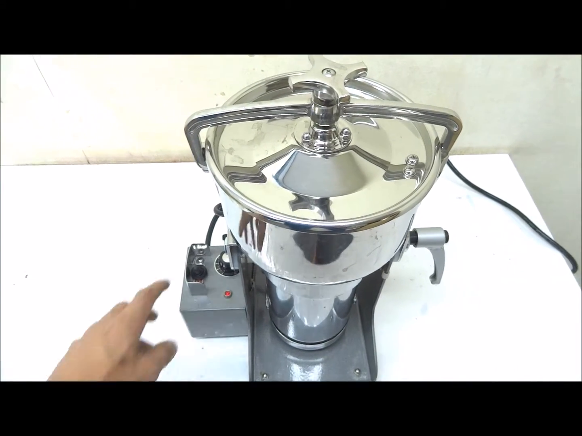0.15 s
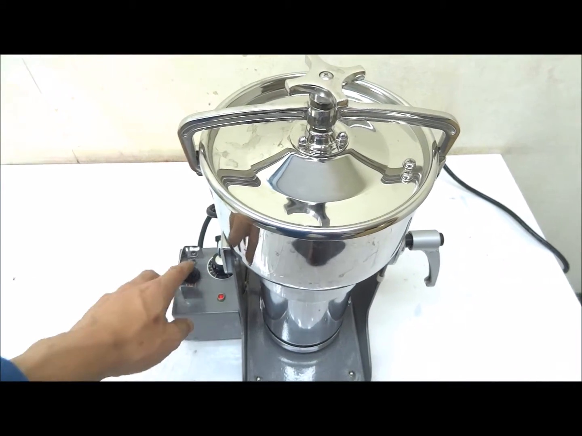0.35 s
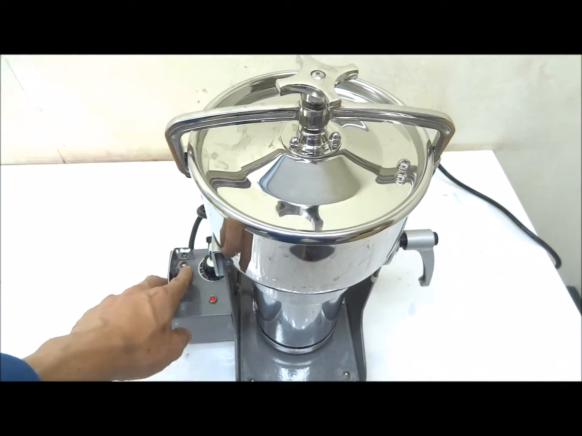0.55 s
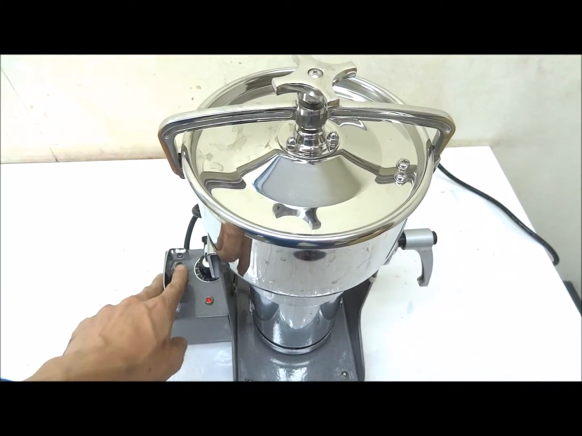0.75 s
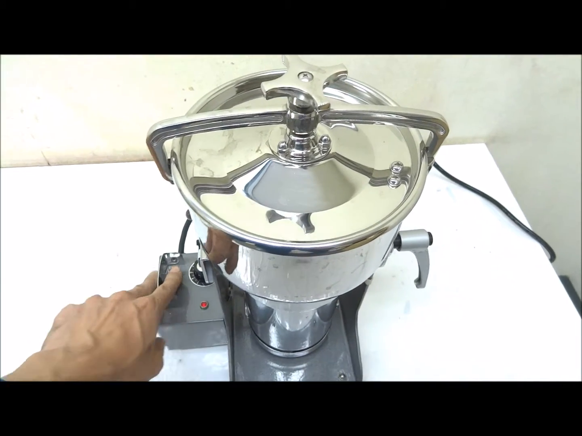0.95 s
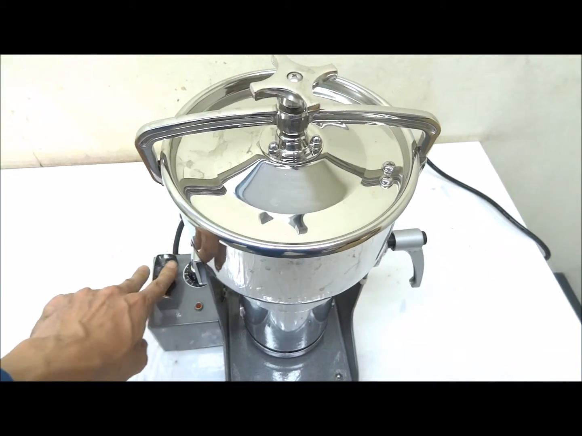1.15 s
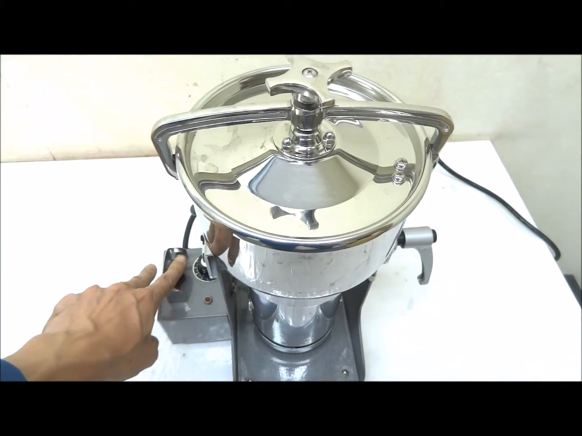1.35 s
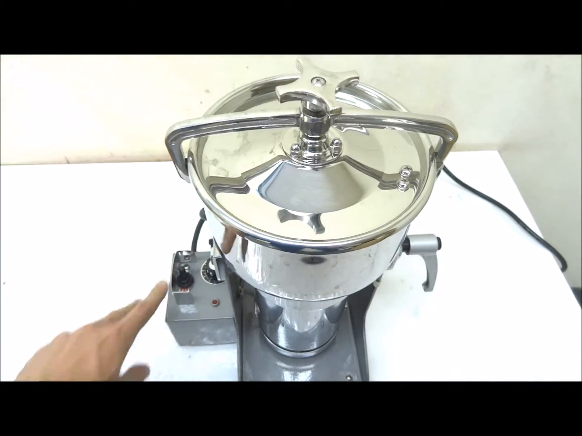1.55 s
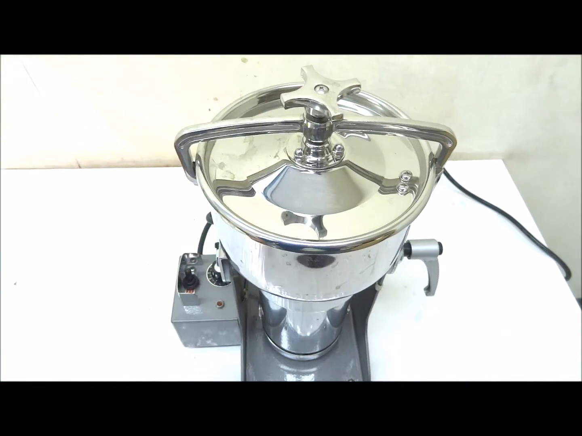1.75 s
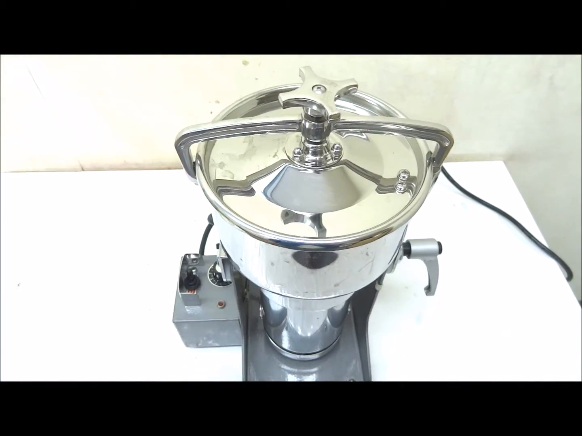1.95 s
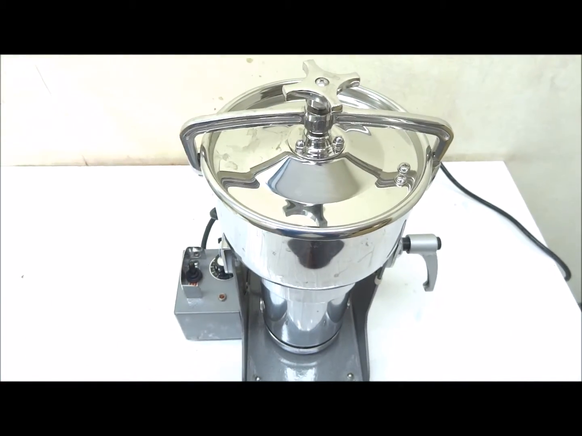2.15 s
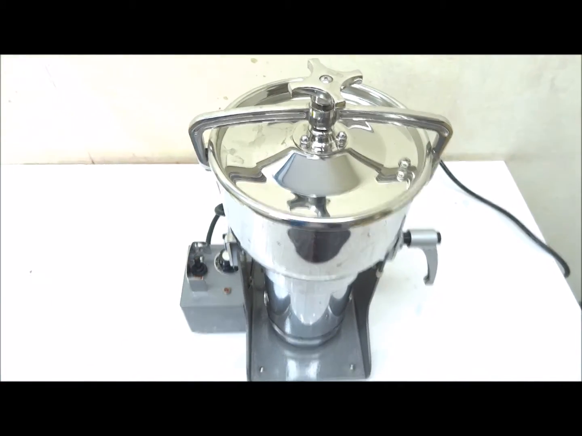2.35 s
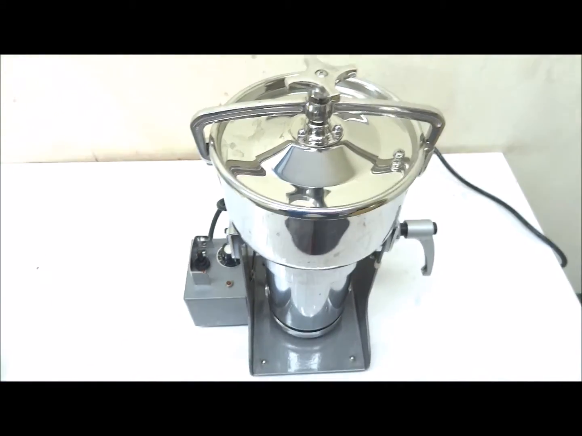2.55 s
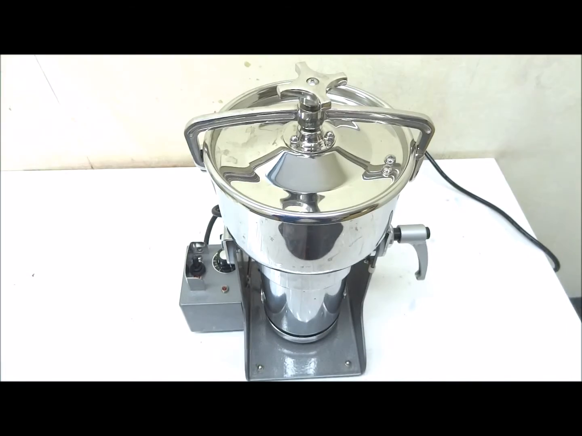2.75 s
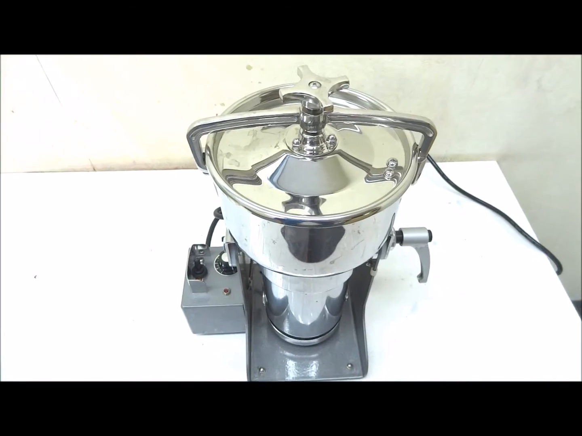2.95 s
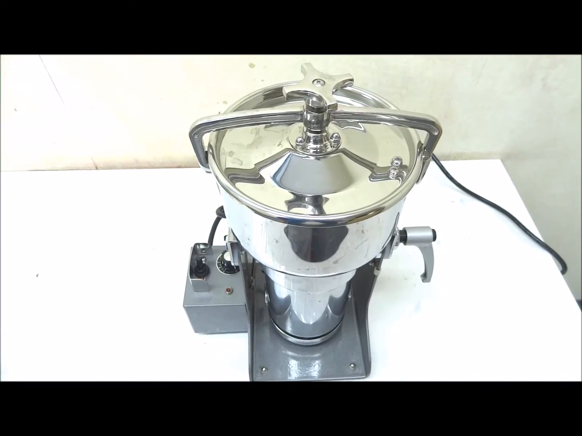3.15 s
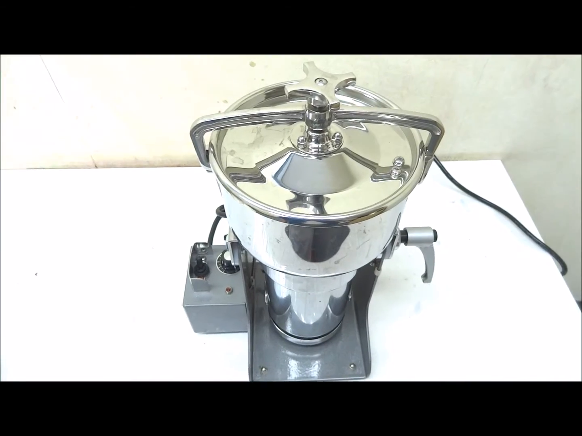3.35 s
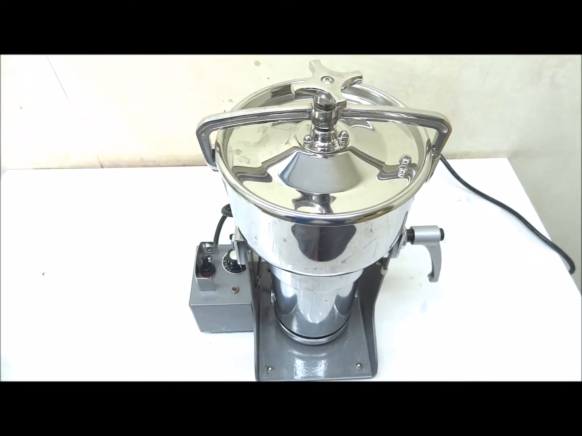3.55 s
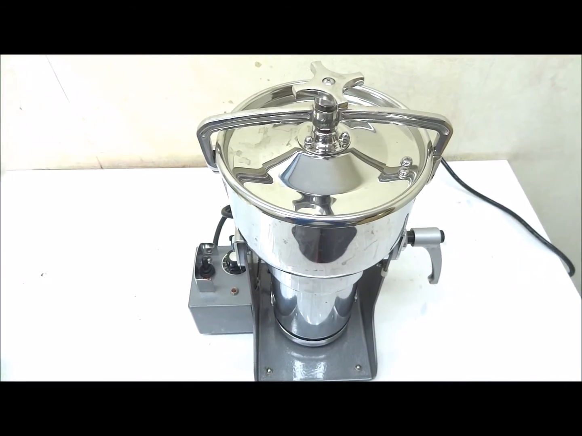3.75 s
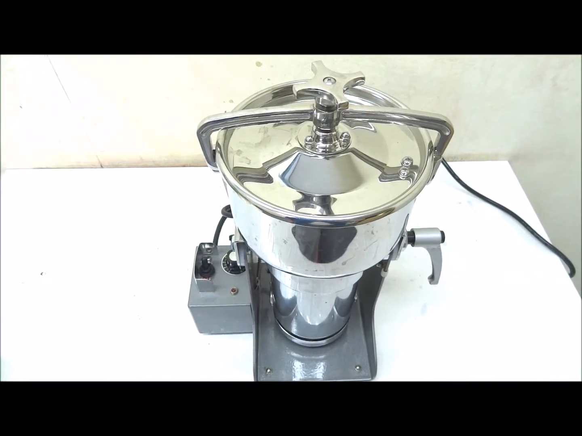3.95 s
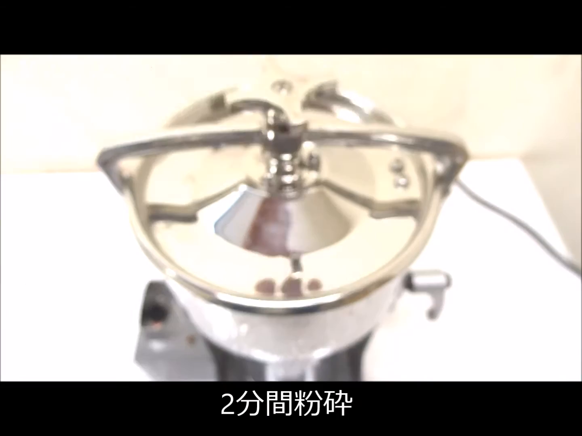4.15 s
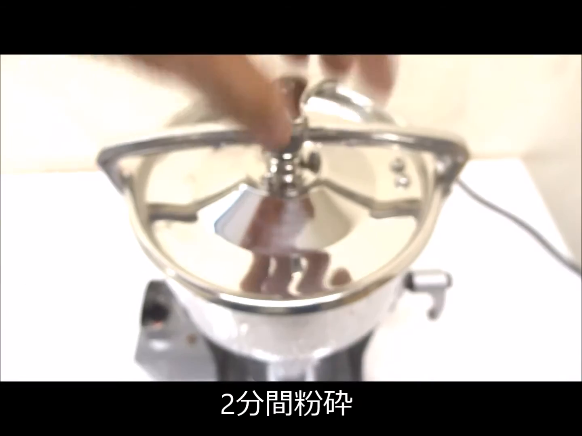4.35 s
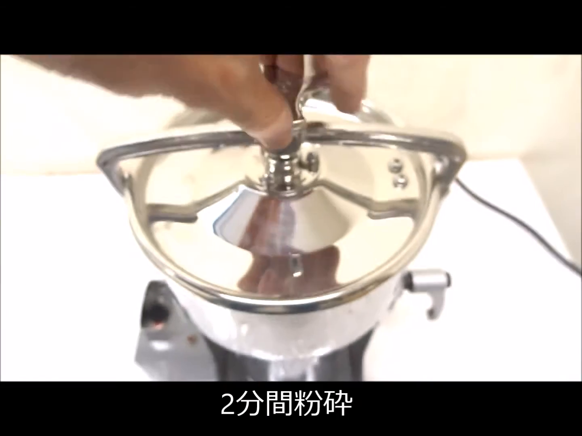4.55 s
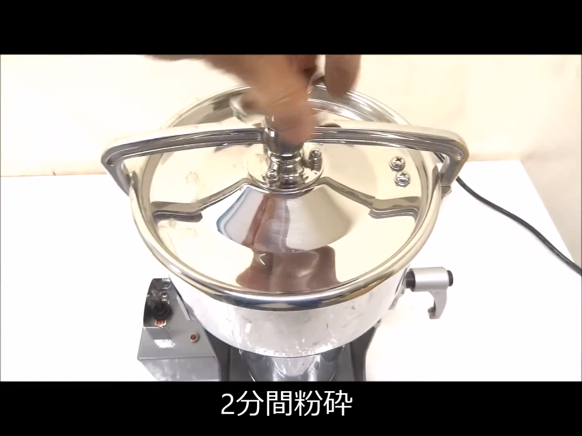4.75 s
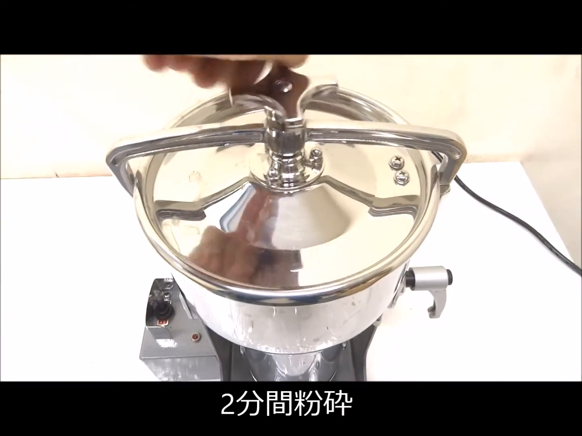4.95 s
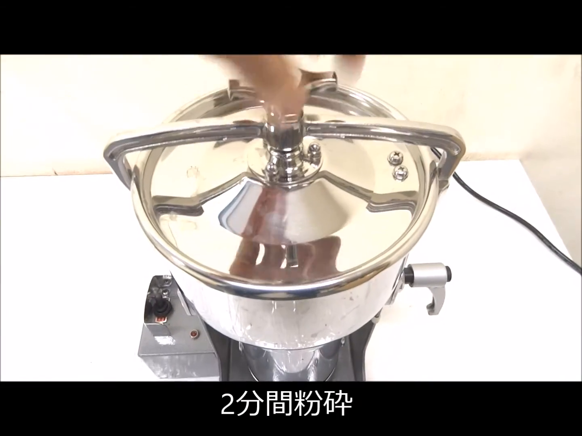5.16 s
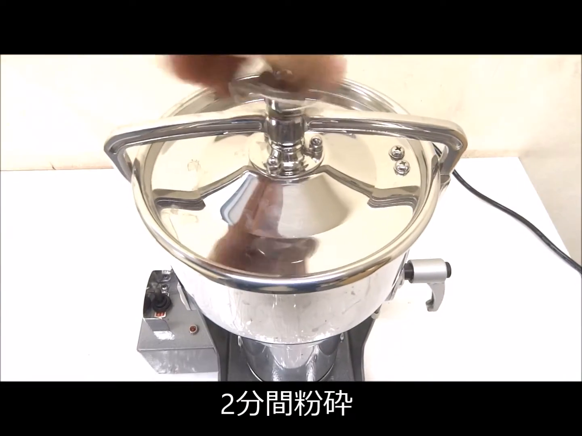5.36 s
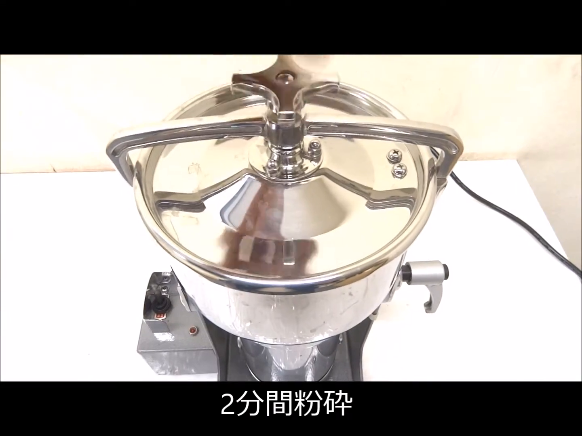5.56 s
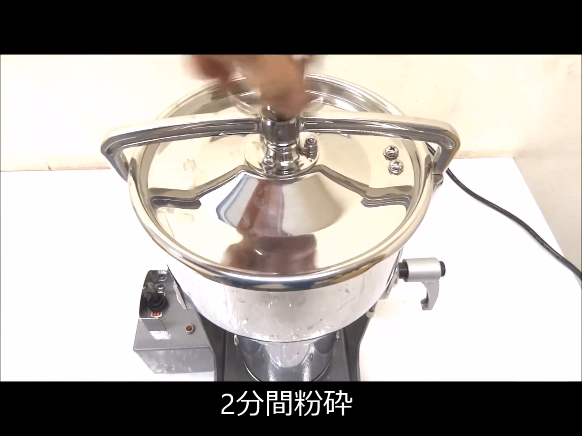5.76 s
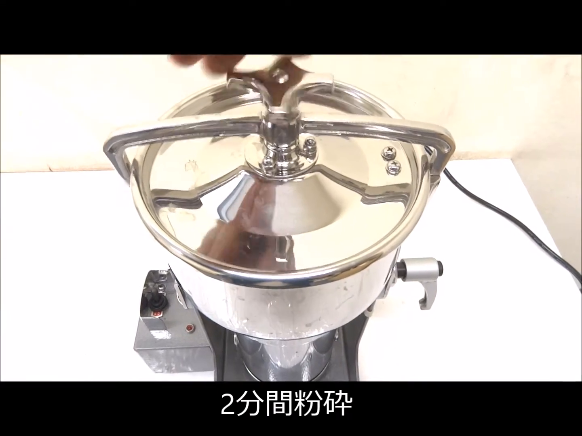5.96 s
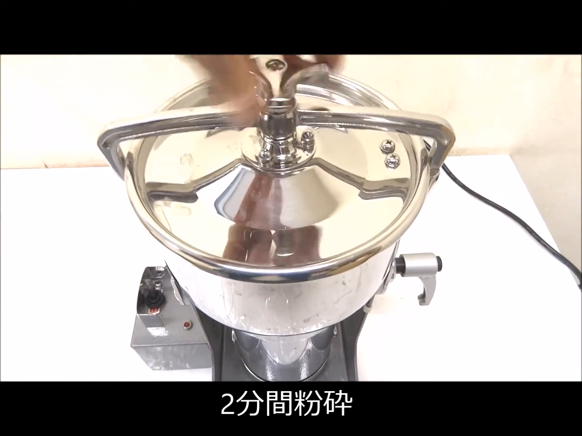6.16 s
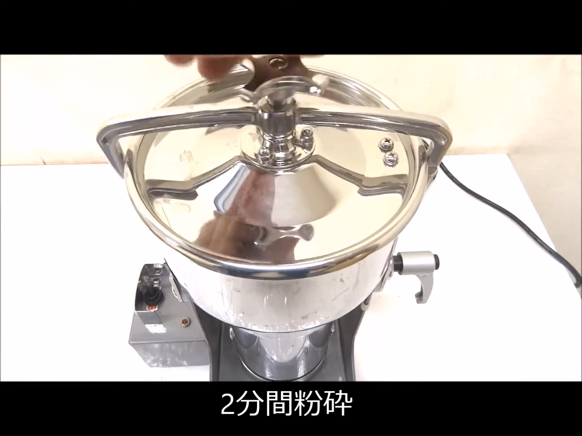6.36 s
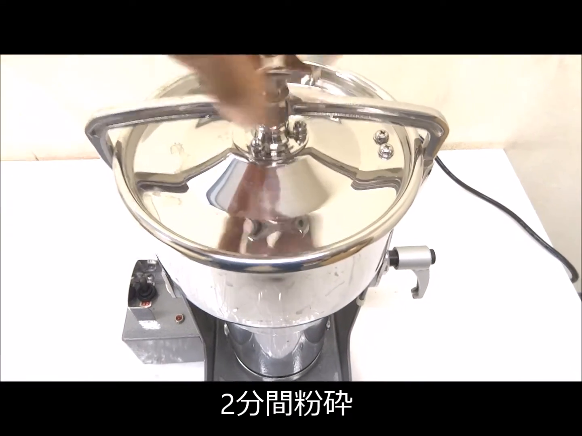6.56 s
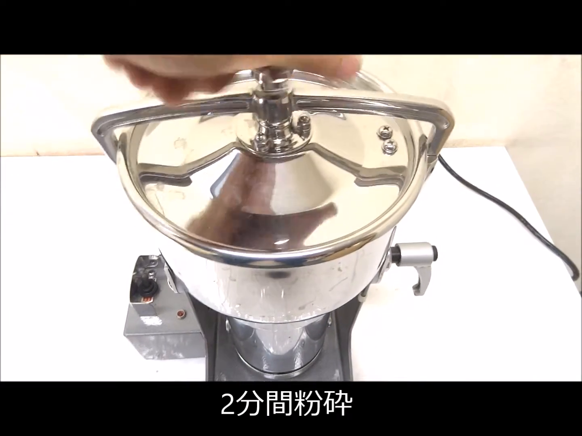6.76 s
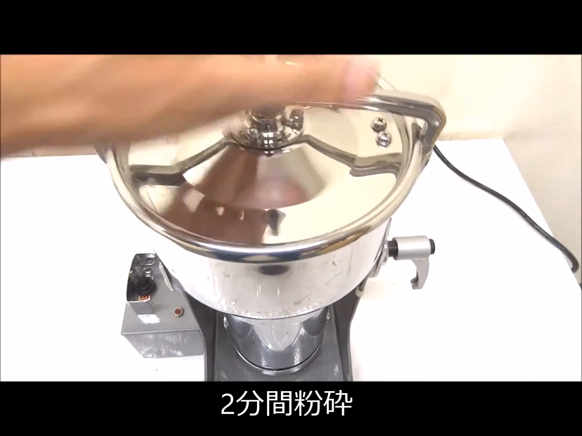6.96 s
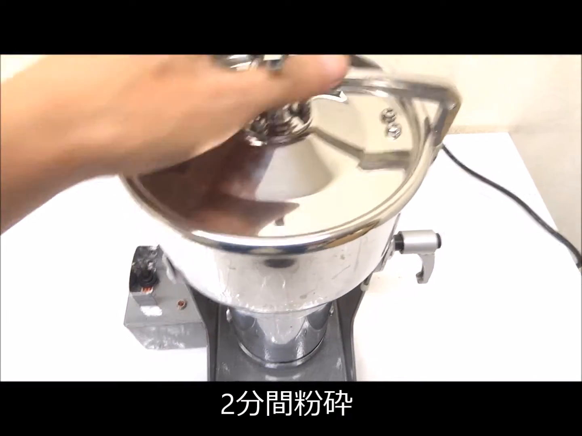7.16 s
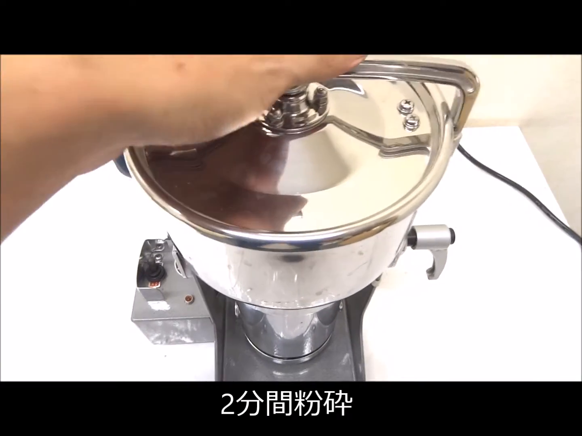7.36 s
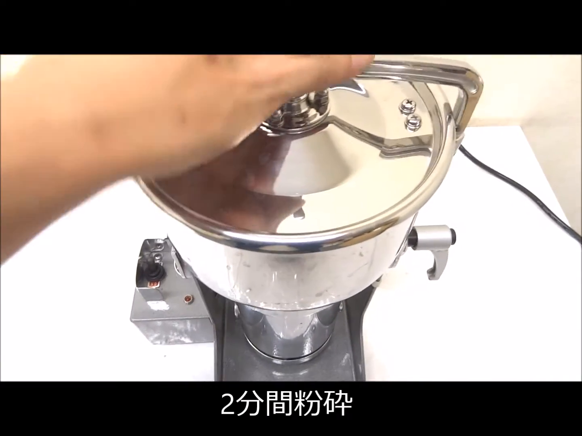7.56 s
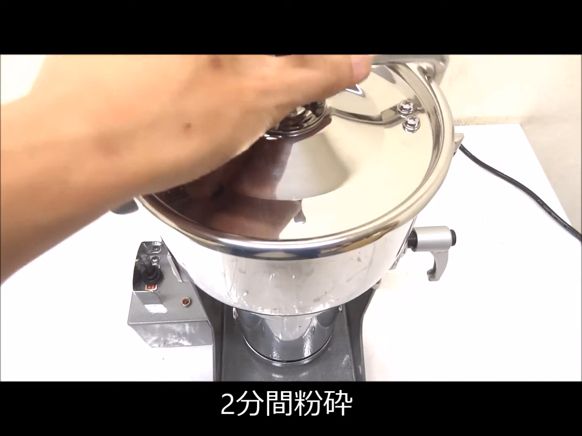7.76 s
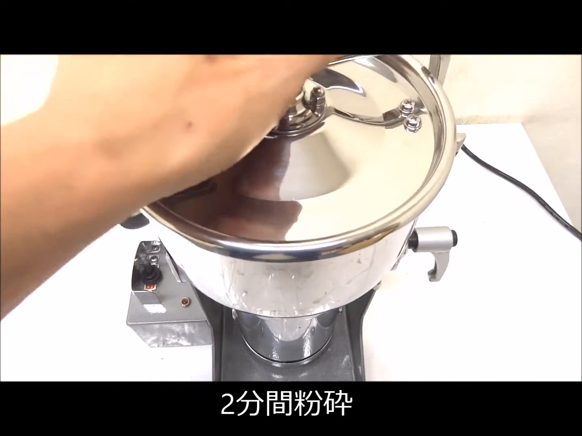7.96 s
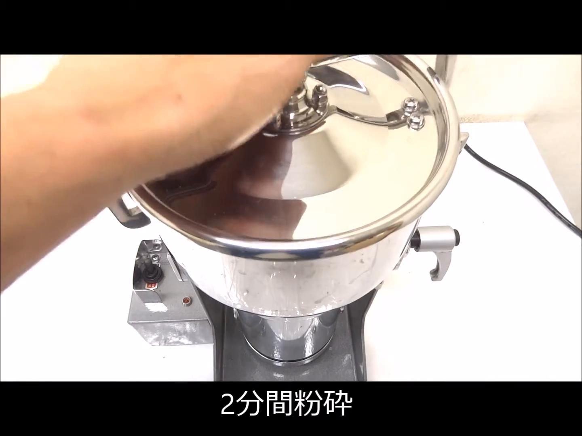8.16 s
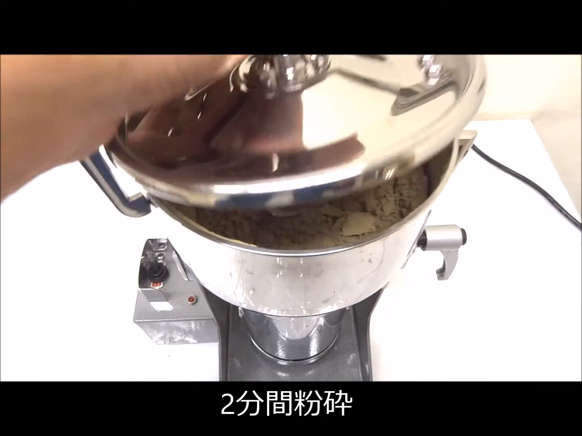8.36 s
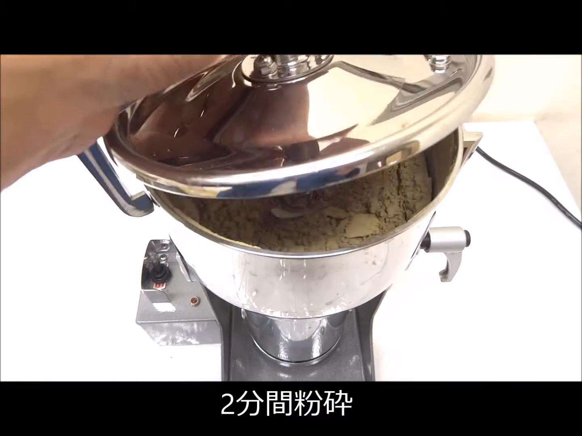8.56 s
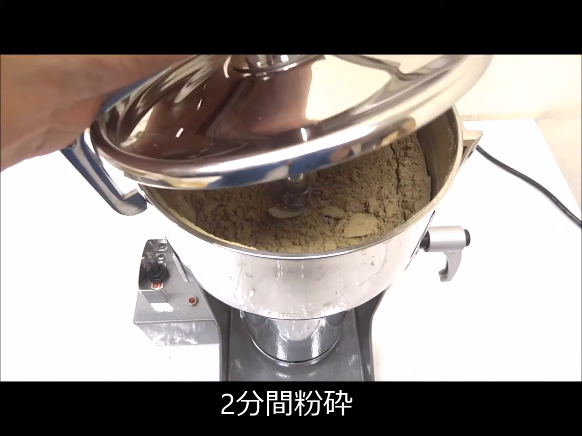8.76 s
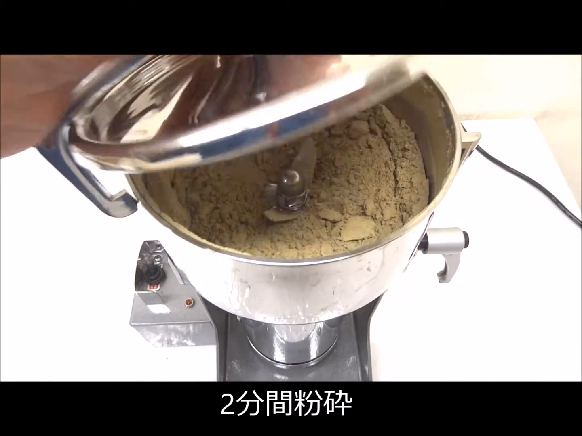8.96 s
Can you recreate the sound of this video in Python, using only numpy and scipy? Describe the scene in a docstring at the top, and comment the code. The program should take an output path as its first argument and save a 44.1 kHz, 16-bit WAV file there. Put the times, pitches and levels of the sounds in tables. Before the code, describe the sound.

Close in a small ventilated room, a steel powder mill roars at full speed, is switched off and glides down in pitch and loudness, rumbling and ringing until it stops. Quiet hum follows. Then a piercing short squeak, a run of bright metallic rattles as the screw is spun out, and sparser ticks and dull bench knocks as the lid lifts.

```python
"""Blade mill coasting down, then its lid comes off

A steel blade mill runs at full speed, is switched off and coasts to rest: shaft tones, rumble, rushing
air and powder ringing the bowl all follow one falling speed. After a quiet moment the clamp screw squeaks
loose and is spun out, rattling the steel bracket; the bracket is swung aside and the lid lifted off.
Bursts of noise drive steel modes, and damped sines make ticks and thuds. A ventilated room hums below."""
import sys
import numpy as np
from scipy import signal
from scipy.fft import rfft, irfft, next_fast_len
from scipy.io import wavfile
from scipy.ndimage import uniform_filter1d

SR = 44100
rng = np.random.default_rng(int(sys.argv[2]) if len(sys.argv) > 2 else 0)


def bounce(signal):
    """Save signal as a 16-bit WAV file at the path given by the first command-line argument."""
    frames = np.transpose(np.atleast_2d(signal))
    limited = np.clip(frames, -1, 1)
    pcm = np.round(limited * 32767).astype(np.int16)
    wavfile.write(sys.argv[1], SR, pcm)


N = 397324   # samples


def from_db(db):
    """Gain of a level in dB."""
    return 10 ** (np.asarray(db) / 20)


def rms_one(x):
    """Scale a sound to an average strength (rms) of 1."""
    return x / np.sqrt(np.mean(x ** 2) + 1e-20)


def drift(rate):
    """Slow random wander of spread 1; a higher rate [Hz] wanders faster."""
    # made at every 40th sample, then joined by straight lines
    r = np.exp(-2 * np.pi * rate * 40 / SR)
    noise = rng.standard_normal(N // 40 + 2002)
    slow = signal.lfilter([1], [1, -2 * r, r * r], noise)[2000:]
    return np.interp(np.arange(N) / 40, np.arange(len(slow)), rms_one(slow))


SIDE_DB = -15


def stereo(mid, side):
    """Left and right from a shared middle and a weaker side of opposite sign."""
    return mid + from_db(SIDE_DB) * side * np.array([[1], [-1]])


def filtered(x, order, cutoff_hz, kind="low"):
    """Keep only the lows, the highs or a band."""
    return signal.sosfilt(signal.butter(order, cutoff_hz, kind, fs=SR, output="sos"), x)


def coloured(spectrum):
    """Stereo noise shaped by a spectrum, rms 1."""
    size = next_fast_len(N)
    hz = np.arange(1, size // 2 + 2) * SR / size
    at_hz, level_db = np.transpose(spectrum)
    shape = from_db(np.interp(np.log(hz), np.log(at_hz), level_db, -90, -90))
    mid, side = irfft(rfft(rng.standard_normal((2, size))) * shape, size)[:, :N]
    return rms_one(stereo(mid, side))


def resonate(x, peaks, speed):
    """Side-by-side resonances, rms 1; each swells near its own best speed and wanders in level."""
    out = 0
    for k, (hz, width, level_db, best_speed, spread) in enumerate(peaks):
        r = np.exp(-np.pi * width / SR)
        mode = signal.lfilter([1, 0, -1], [1, -2 * r * np.cos(2 * np.pi * hz / SR), r * r], x)
        mode *= from_db(1.25 * drift(1.5)) / (1 + ((speed - best_speed) / spread) ** 2)
        out = out + (-1) ** k * from_db(level_db) * (1 - r * r) * mode
    return rms_one(out)


def ring(clicks, hz, t60):
    """A unit click sets off a sine of height 1 that dies by 60 dB in t60 seconds."""
    r, w = from_db(-60 / (t60 * SR)), 2 * np.pi * hz / SR
    return signal.lfilter([0, np.sin(w)], [1, -2 * r * np.cos(w), r * r], clicks + 1e-18)


def grains(per_s, spread_db):
    """Random clicks of uneven size and either sign."""
    sizes = from_db(spread_db * np.minimum(rng.exponential(1, N), 5)) * rng.choice([-1, 1], N)
    return sizes * (rng.random(N) < per_s / SR)


def pings(rows, rise_s):
    """Damped sines from rows of (time [s], level [dB], frequency [Hz], t60 [s])."""
    out, t = np.zeros(N + SR // 4), np.arange(SR // 4) / SR
    for s, level_db, hz, t60 in rows:
        envelope = from_db(level_db - 60 * t / t60) * (1 - np.exp(-t / rise_s))
        out[int(s * SR):][:len(t)] += envelope * np.sin(2 * np.pi * hz * t)
    return out[:N]


# the shaft running, then coasting to rest: (time [s], speed [turns/s])
SPEED = [(0, 267), (.95, 254), (1.1, 258), (1.3, 216), (1.6, 186.6), (1.9, 155.4), (2.2, 124.7), (2.5, 92),
         (2.8, 68.4), (3.1, 27), (3.7, 0.74)]


def shaft_speed():
    """Speed of the shaft at every sample; at rest after the last row."""
    at_s, speed = np.transpose(SPEED)
    return np.interp(np.arange(N) / SR, at_s, speed, 0, 0)


# resonances of the stand that the shaft tones sweep through: (frequency [Hz], width [Hz], level [dB])
STAND = [(96, 6.6, 1.5), (123.3, 17, 2.5), (192, 65, 2), (261.6, 46, -2), (307, 12, 0), (363, 46, -1),
         (462, 71, 0.5)]


def stand(hz):
    """Gain of the stand at a moving pitch: large near its resonances."""
    return sum(from_db(level_db) / (1 + (1.3 * (hz - mode_hz) / width) ** 2) ** 2
               for mode_hz, width, level_db in STAND)


FORCE_DB_PER_OCTAVE = 14   # unbalance grows with speed
ONCE_DB, TWICE_DB, BLADE_DB = -26, -26.5, -20   # shaft tones before speed and stand change them
# the half-turn wobble dies below a speed [turns/s], by so many dB per turn/s
HALF_DB, HALF_ABOVE, HALF_FADE_DB = -49, 245, .25
# blades slap the settling powder between these speeds [turns/s], weaker below
SLAP_FROM, SLAP_TO, SLAP_DROP_DB = 158, 88.5, 25
# bands that the blade tips' pulses ring:
# (frequency [Hz], width [Hz], level [dB], best speed [turns/s], spread [turns/s])
BRUSH = [(7350, 450, 1, 172, 25), (10500, 800, -4, 222, 30)]


def rotor():
    """Tones of the turning shaft, and a pulse as each of three blade tips passes."""
    speed = shaft_speed()
    turns = np.cumsum(speed) / SR
    force_db = FORCE_DB_PER_OCTAVE * np.log2((speed + 1e-3) / SPEED[0][1])
    once = from_db(ONCE_DB + force_db + 1.8 * drift(16)) * stand(speed)
    twice = from_db(TWICE_DB + 2 * force_db + 3 * drift(19)) * stand(2 * speed)
    half_db = HALF_DB - HALF_FADE_DB * np.maximum(HALF_ABOVE - speed, 0)
    half = from_db(half_db + 4.2 * drift(38)) * stand(speed / 2)
    slap_db = np.interp(speed, [SLAP_TO - 4, SLAP_TO, SLAP_FROM, SLAP_FROM + 6], [-SLAP_DROP_DB, 0, 0, -60])
    blade = from_db(BLADE_DB + slap_db + 1.5 * drift(15)) * stand(3 * speed)
    tones = once * np.sin(2 * np.pi * turns) + twice * np.sin(4 * np.pi * turns)
    tones += half * np.sin(np.pi * turns) + blade * np.sin(6 * np.pi * turns)
    tip_pulses = np.diff(np.floor(3 * turns), prepend=0) + 1e-18
    return np.sqrt(2) * tones + from_db(-36.5) * resonate(tip_pulses, BRUSH, speed)


# loudness follows speed: (speed [turns/s], housing rumble [dB], air rush [dB], powder on the bowl [dB])
LOAD = [(0, -77.5, -87.5, -75), (3, -72, -57, -70), (7.84, -39.5, -51.5, -46), (21.8, -43, -39, -25.5),
        (53.3, -37, -29, -22.5), (93, -31, -25, -22.5), (125, -25.5, -25.5, -23), (160, -24.5, -21, -20.5),
        (210, -22, -18.5, -23.5), (273, -21.5, -17.5, -17.5)]
# spectra of the rumble and of the air rush: (frequency [Hz], relative level [dB])
RUMBLE = [(35, -66.5), (60, -44), (123, -17), (170, -29), (254, -8.5), (295, -8.5), (526, 0.5), (620, -2.5),
          (862, -2.5), (1600, -8.5), (2080, -28.5), (3520, -120)]
RUSH = [(710, -56), (1200, -4.5), (2420, 3.5), (2610, 0.5), (3430, 0), (3950, 3), (6100, 1), (9610, -2.5),
        (10600, 1), (11200, -4), (11500, -28), (15000, -56.5), (22000, -120)]
# modes of the housing and of the bowl, each driven best near one speed:
# (frequency [Hz], width [Hz], level [dB], best speed [turns/s], spread [turns/s])
HOUSING = [(329.4, 60, -5.5, 40, 78), (448, 28, 0, 24, 43), (534, 18, -2.5, 237, 88),
           (770, 13, -2, 190, 48), (873, 26, -1, 220, 110), (1090, 49, -5.5, 226, 64)]
BOWL = [(1274, 10, -13, 41, 61), (1532, 50, -11, 63, 270), (1758, 33, -4.5, 25, 180),
        (1922, 28, -2, 41, 140), (2306, 13, 7, 55, 61), (2600, 15, -2, 260.5, 1.5),
        (2630, 25, -0.5, 120, 72), (2910, 119, -3.5, 95, 75), (2910, 21, 3.5, 142, 74),
        (3020, 13, -1, 210, 23), (3572, 19, 4, 95, 35), (3710, 38, -3.5, 87, 27), (3960, 36, -6.5, 240, 49),
        (4514, 38, -9, 81, 54), (5540, 75, -8.5, 110, 66), (6770, 39, -4, 80, 19),
        (7200, 260, -13.5, 134, 71), (7300, 23, -5, 85, 30), (8520, 32, -12.5, 260, 14),
        (10670, 690, -8.5, 116, 28.2)]


def grinding():
    """Rumble of the housing, air driven by the blades, powder thrown against the bowl."""
    speed = shaft_speed()
    housing = resonate(rng.standard_normal(N), HOUSING, speed)
    bowl = resonate(grains(5000, 2.5), BOWL, speed)
    # a late copy, like a wall echo, differs left and right
    housing, bowl = (stereo(x, np.roll(x, 1500)) for x in (housing, bowl))
    rumble = rms_one(coloured(RUMBLE) + from_db(1.5) * housing)
    at_speed, rumble_db, rush_db, powder_db = np.transpose(LOAD)
    out = from_db(np.interp(speed, at_speed, rumble_db) + 0.89 * drift(11)) * rumble
    out += from_db(np.interp(speed, at_speed, rush_db) + 0.84 * drift(23)) * coloured(RUSH)
    return out + from_db(np.interp(speed, at_speed, powder_db) + 0.79 * drift(14)) * bowl


HUM_DB = -44.5   # before louder sounds press it down
# spectrum of the ventilated room: (frequency [Hz], relative level [dB])
HUM = [(15, -63.5), (25, -20.5), (205, -9.5), (233, -6.5), (360, -4), (617, -10.5), (702, -8.5),
       (1600, -16.5), (2010, -15.5), (2340, -18.5), (3530, -30), (10400, -39.5), (11500, -43), (15000, -99),
       (22000, -120)]


def room_hum():
    """Steady noise of the ventilated room, wandering a little in level."""
    return from_db(HUM_DB + .5 * drift(7.8)) * coloured(HUM)


def gain_control(loud, start_db, slope, release_db_s, attack_s):
    """Gain that sinks shortly after loud sound arrives and then creeps back."""
    level_db = 10 * np.log10(uniform_filter1d(loud ** 2, size=221, origin=110) + 1e-12)
    # the held level jumps up with the sound but falls only at the release rate
    ramp = release_db_s * np.arange(N) / SR
    held_db = np.maximum.accumulate(level_db + ramp) - ramp
    r = np.exp(-1 / (attack_s * SR))
    return from_db(-slope * signal.lfilter([1 - r], [1, -r], np.maximum(held_db - start_db, 0)))


GAP_S, GAP_LENGTH_S, GAP_DB = 4.148, .039, -34
RETURN_DB, RETURN_S = -14, 0.034   # level on return, time constant of the fade up


def dropout():
    """The level dips briefly; the sound returns low and fades up."""
    since = np.arange(N) / SR - GAP_S - GAP_LENGTH_S
    back_db = RETURN_DB * np.exp(-np.maximum(since, 0) / RETURN_S)
    return from_db(np.where(since > 0, back_db, GAP_DB * (since > -GAP_LENGTH_S)))


# the squeak: rise, hold, then a weaker dying tail
SQUEAK_S, SQUEAK_RISE_S, SQUEAK_HOLD_S, LET_GO_S = 4.7, .036, .092, .006
SQUEAK_DB, SQUEAK_SWELL_DB, TAIL_DB, TAIL_DB_PER_S = -8.5, 7, -19.5, 171
SQUEAK_HZ, SQUEAK_SAG_HZ, TAIL_HZ = 10140, 180, 10010


def squeak():
    """Stick-slip of the thread locks onto one high mode, swells and sags, lets go and dies."""
    t = np.arange(N) / SR - SQUEAK_S - SQUEAK_RISE_S
    held = np.clip(t / SQUEAK_HOLD_S, 0, 1)
    tail = np.clip((t - SQUEAK_HOLD_S) / LET_GO_S, 0, 1)   # 0 while locked, 1 once let go
    hz = tail * TAIL_HZ + (1 - tail) * (SQUEAK_HZ - SQUEAK_SAG_HZ * held) + 25 * drift(119)
    locked_db = SQUEAK_DB + SQUEAK_SWELL_DB * held + 60 * np.minimum(t, 0) / SQUEAK_RISE_S
    dying_db = TAIL_DB - TAIL_DB_PER_S * (t - SQUEAK_HOLD_S) + 2.5 * drift(90)
    level_db = tail * dying_db + (1 - tail) * locked_db + .9 * drift(70)
    return np.sqrt(2) * from_db(level_db) * np.sin(2 * np.pi * np.cumsum(hz) / SR)


ROOM_DB, ROOM_T60_S, ROOM_DULL_HZ = -5.5, 0.29, 9840


def room(x):
    """A dense dying echo, mostly alike on both sides."""
    t = np.arange(SR // 2) / SR
    echo = stereo(*rng.standard_normal((2, len(t)))) * from_db(-60 * t / ROOM_T60_S) * (t > .004)
    echo = filtered(echo, 1, ROOM_DULL_HZ)
    echo = echo / np.sqrt(np.sum(echo[0] ** 2))
    return from_db(ROOM_DB) * signal.fftconvolve(x[None], echo, axes=1)[:, :N]


STEEL_T60_S = .055   # hand and clamp damp the steel
# blows and slips on bracket and lid: (time [s], level [dB],
# two lower registers against the two upper [dB], top against upper register [dB], contact t60 [s])
BLOWS = [(4.825, -62.5, 14.5, 0, 0.088), (4.861, -30, 2.5, 0, .05), (4.874, -14.5, -8, -10, 0.032),
         (4.963, -22, -14, 8, 0.053), (5.177, -28.5, -2, 0, 0.023), (5.221, -24.5, 2, 1, 0.021),
         (5.242, -21.5, -8, 10, 0.018), (5.267, -19.5, -7, 2, 0.042), (5.296, -16.5, -7, 4, 0.021),
         (5.329, -14.5, -17, -2, 0.031), (5.351, -25, -9, 17, .038), (5.377, -18, -19, -3.5, 0.075),
         (5.395, -26, -9, 12, 0.044), (5.42, -21, -15, 3, .06), (5.477, -15.5, -14.5, -2, 0.041),
         (5.504, -28.5, -4, 18, 0.047), (5.515, -15.5, -22, -7.5, 0.021), (5.687, -20, -1.5, 4, 0.036),
         (5.797, -21.5, -11, 3, 0.089), (5.83, -22.5, -6, 0.5, 0.15), (5.869, -29, -11, -4, 0.18),
         (5.905, -26, 0, 18, 0.033), (5.93, -21, -14, -5, 0.18), (6.131, -16.5, -11.5, -1.5, 0.035),
         (6.157, -27, -10, 11, 0.11), (6.202, -17.5, -15, -1, 0.033), (6.234, -22, -9, 3, 0.093),
         (6.295, -14, -4, 1, 0.021), (6.306, -22.5, -22, 0, 0.25), (6.358, -23.5, -8, 1, 0.09),
         (6.385, -18, -18, 2, 0.033), (6.45, -16.5, -11.5, -4, 0.033), (6.519, -25, -4, -1, .03),
         (6.558, -24.5, -0.5, -11, 0.027), (6.596, -26, -18, 13, 0.12), (6.658, -23, -7.5, 8, 0.1),
         (6.689, -34, -2, -8, .055), (6.728, -26.5, -35, 6, 0.13), (6.771, -14.5, -1, -5, 0.026),
         (6.836, -23.5, -19, 11, 0.1), (6.86, -23, -8.5, -2, 0.17), (6.982, -16, -11.5, 1.5, 0.033),
         (7.058, -25, -12, 0, 0.09), (7.067, -27, -5.5, 7, 0.14), (7.1, -26.5, -4, -4, 0.1),
         (7.177, -11, -10.5, 8, 0.02), (7.198, -26.5, 5, -21, 0.032), (7.546, -62, 11, 0, 0.042),
         (7.594, -31, -9, 8.5, 0.19), (7.877, -17, -4, 3.5, 0.032), (8.663, -28.5, 11, -5, .02),
         (8.835, -34, 5, 0, 0.032), (8.853, -22.5, 11.5, -6, .02), (8.873, -54, 12, 4, 0.023),
         (8.906, -45, 16, 16, .028), (8.997, -50, 15.5, 1, 0.027)]
# four registers of pitch: (from [Hz], to [Hz])
REGISTERS = [(300, 1300), (1300, 3000), (3000, 7000), (7000, 11000)]
# noise of the contact itself, one value per register: level [dB]
CRACK_DB = [4.1, 7.1, 1.46, 4.6]
# modes of the steel of bracket and lid: (frequency [Hz], level [dB])
STEEL = [(330, -17), (560, -14), (680, -14), (960, -18), (1280, -17), (1430, -15), (1810, -12), (1880, -9),
         (2310, -15), (2610, -10), (2730, -13), (3400, -17), (3570, -12), (3640, -10), (4590, -11),
         (4655, -8), (4755, -7), (5700, -14), (5850, -8), (6220, -17), (7100, -15), (8010, -14),
         (8400, -14), (8980, -13), (9500, -13), (9880, -15), (10300, -14), (10950, -15)]


def blows():
    """Rough bursts of force crack and drive each steel mode by its own strength; the thread chatters too."""
    rows, t = np.array(BLOWS), np.arange(SR // 8) / SR
    # column 0 is the crack, without luck; the others are the modes
    luck_db = rng.normal(0, 4.5, (len(rows), len(STEEL) + 1))
    luck_db[:, 0] = 0
    shapes = [(1 - np.exp(-t / .003)) * from_db(-60 * t / t60) for t60 in rows[:, 4]]
    chatter = twisting() * rms_one(grains(900, 5.3))
    rough = rng.standard_normal(N)
    wander = from_db(-22.5 + 6.63 * drift(35.2))

    def force(register, column):
        """Noise under the envelopes of all contacts."""
        envelope = np.zeros(N + len(t))
        for row, shape, gain in zip(rows, shapes, from_db(luck_db[:, column])):
            start_s, level_db, lower_db, top_db = row[:4]
            balance_db = [lower_db, lower_db, -top_db / 2, top_db / 2][register]
            envelope[int(start_s * SR):][:len(t)] += from_db(level_db + balance_db) * gain * shape
        return envelope[:N] * np.roll(rough, register * SR)

    out = np.zeros(N)
    for k, (low, high) in enumerate(REGISTERS):
        crack = filtered(force(k, 0), 2, [low, high], "band")
        out += from_db(CRACK_DB[k]) * np.sqrt(SR / 2 / (high - low)) * crack   # evens out band widths
        for m, (hz, level_db) in enumerate(STEEL):
            if low <= hz < high:
                drive = from_db(-15.5) * force(k, m + 1) + np.roll(wander, m * SR // 4) * chatter
                out += from_db(level_db) * ring(drive, hz, STEEL_T60_S)
    scrape = filtered(chatter, 2, 1500, "high")
    return out + from_db(-20.5) * scrape


TWIST_RISE_DB_PER_S, TWIST_FALL_DB_PER_S = 598.5, 152
# each twist of the screw makes it chatter in its thread: (time [s], length [s], level [dB])
TWISTS = [(4.855, 0.063, -37), (5.284, 0.18, -34), (5.684, 0.3, -39), (6.161, 0.22, -32.5),
          (6.606, 0.26, -31.5), (7.097, 0.038, -33), (7.613, 0.03, -46), (8.1, 0.19, -62)]


def twisting():
    """Strength of the thread chatter: each twist rises fast, holds and dies."""
    t, out = np.arange(N) / SR, np.zeros(N)
    for s, length, level_db in TWISTS:
        rise_db = TWIST_RISE_DB_PER_S * np.maximum(s - t, 0)
        fall_db = TWIST_FALL_DB_PER_S * np.maximum(t - s - length, 0)
        out += from_db(level_db - rise_db - fall_db)
    return out


# short pitched ticks and knocks of latch and lid: (time [s], level [dB], frequency [Hz], t60 [s])
TICKS = [(4.9513, -17.5, 1940, 0.025), (5.0543, -25, 2100, .017), (5.461, -13.5, 1940, 0.017),
         (5.688, -24, 2280, .016), (6.124, -19.5, 1850, 0.045), (6.772, -25, 1800, .016),
         (7.3545, -19.5, 1940, 0.033), (7.55, -34, 1900, 0.044), (7.597, -23.5, 680, 0.038),
         (7.827, -18, 1870, 0.033), (7.879, -15.5, 656, .04), (8.118, -26, 700, 0.03),
         (8.1206, -23, 1960, 0.016), (8.1305, -23, 1840, .022), (8.156, -35, 2730, 0.061),
         (8.388, -18.5, 1570, 0.014), (8.39, -27, 2190, 0.014), (8.6546, -16, 1900, .022),
         (8.8038, -18.5, 1880, 0.065), (8.836, -22, 683, 0.071), (8.853, -21, 690, 0.14),
         (8.9062, -12, 1880, 0.028)]


def latch():
    """Dry ticks: a short ring with a duller knock and a soft click on its front."""
    clicks = np.zeros(N)
    clicks[[int(row[0] * SR) for row in TICKS]] = from_db([row[1] for row in TICKS])
    front = from_db(-6) * ring(clicks, 2600, .007) + from_db(-8) * ring(clicks, 1250, .01)
    return filtered(pings(TICKS, rise_s=.0004) + front, 2, 3500)


THUD_T60_S = 0.17
# knocks of hand and base through the bench: (time [s], level [dB], frequency [Hz])
THUDS = [(5.243, -33, 272), (5.71, -33, 273), (5.837, -23.5, 261), (6.162, -30, 139), (6.392, -30, 302),
         (6.666, -23, 149), (6.769, -24, 254), (6.887, -32, 149), (7.078, -20, 150), (7.204, -27.5, 144),
         (7.607, -33, 131), (8.659, -32, 135), (8.839, -35, 246)]


def bench():
    """Thuds ring the bench at its pitch, with a dull overtone above."""
    rows = [(*row, THUD_T60_S) for row in THUDS]
    rows += [(s, level_db - 2, 2.3 * hz, .09) for s, level_db, hz in THUDS]
    return filtered(pings(rows, rise_s=.006), 2, 110, "high")


def scene():
    """Mill, clamp and lid in the humming room; mill presses the hum down, clatter itself and the hum."""
    metal, ticks, thread = blows() + bench(), latch(), squeak()
    mill = rotor() + grinding()
    echo = room(metal + from_db(-6.5) * ticks + from_db(-1.5) * thread)
    clatter = metal + ticks + thread + echo
    hum = room_hum()
    hum *= gain_control(mill.mean(axis=0), start_db=-37.5, slope=0.16, release_db_s=58, attack_s=.02)
    gain = gain_control(clatter.mean(axis=0), start_db=-27.5, slope=0.3, release_db_s=212, attack_s=0.0084)
    return mill + gain * (clatter + hum)


CUTOFF_HZ = 11000


def record(dry):
    """A bass cut, a slight lean to the left, the dropout, rounded peaks and a steep top cut."""
    x = filtered(dry, 2, 80, "high")
    x = x * from_db([[.15], [-.15]]) * dropout()
    rounded = 1.4 * np.tanh(x / 1.4)
    return signal.sosfilt(signal.ellip(12, .5, 70, CUTOFF_HZ, fs=SR, output="sos"), rounded)


dry = scene()
out = record(dry)
bounce(out)
```